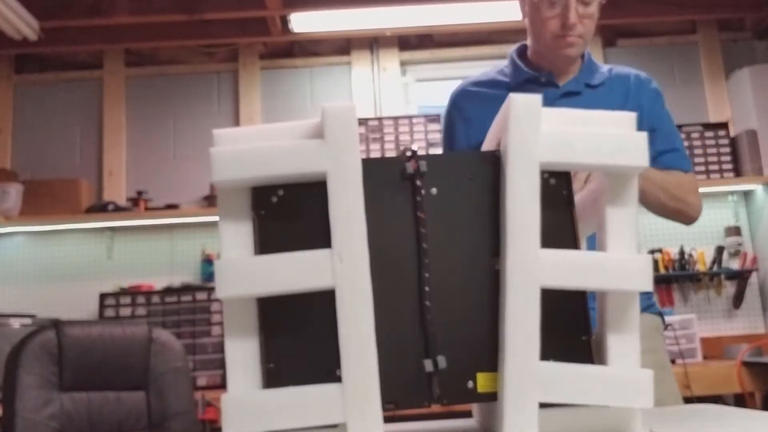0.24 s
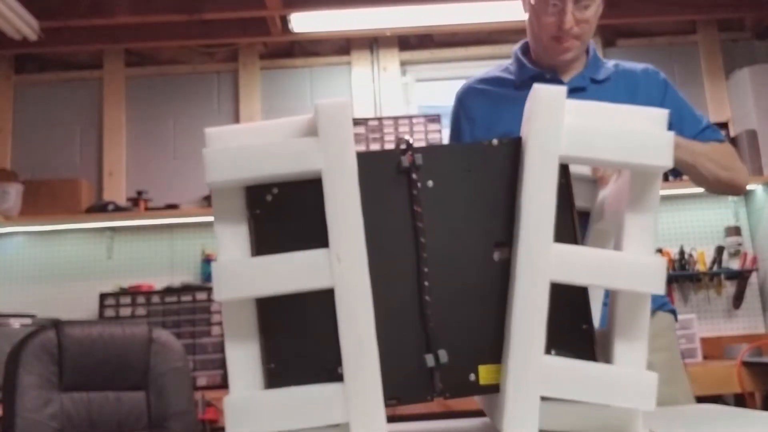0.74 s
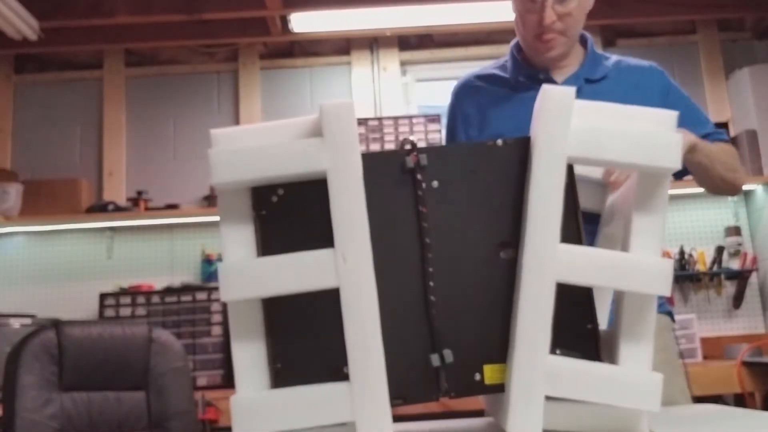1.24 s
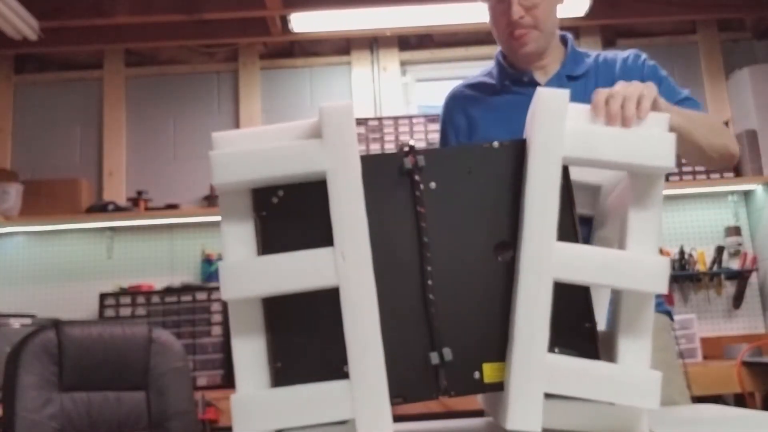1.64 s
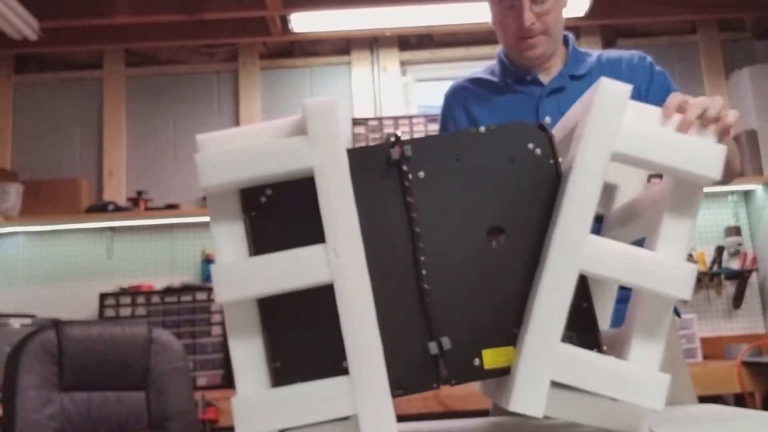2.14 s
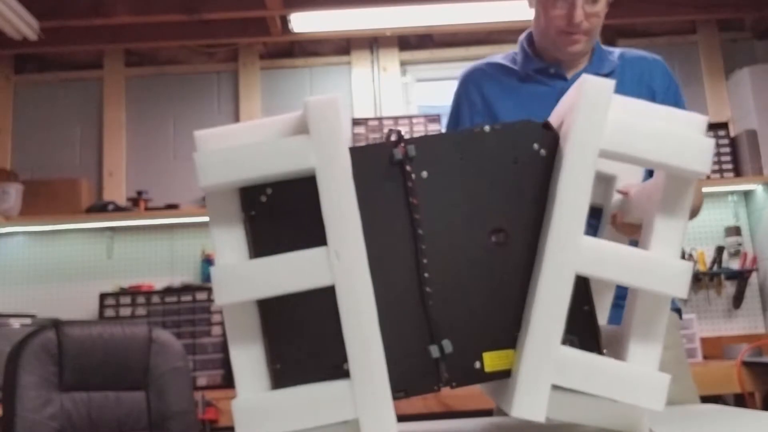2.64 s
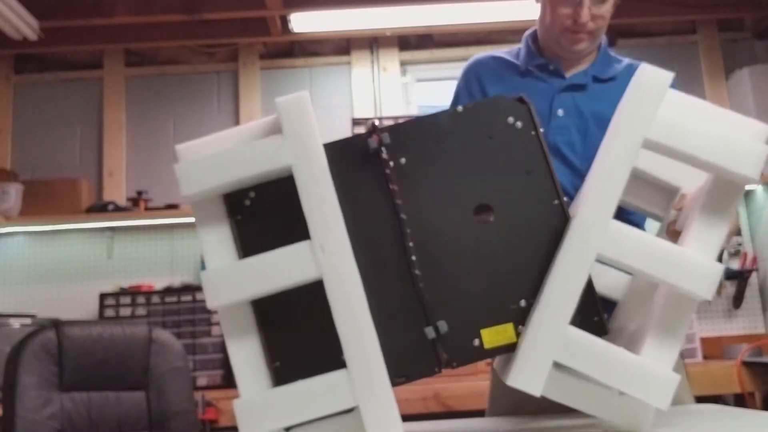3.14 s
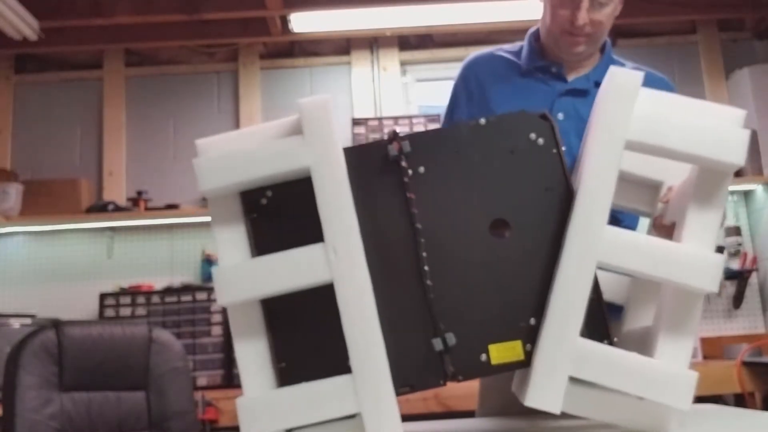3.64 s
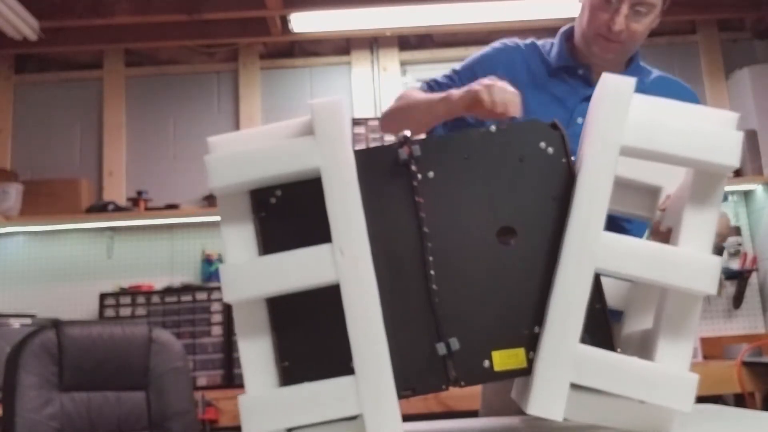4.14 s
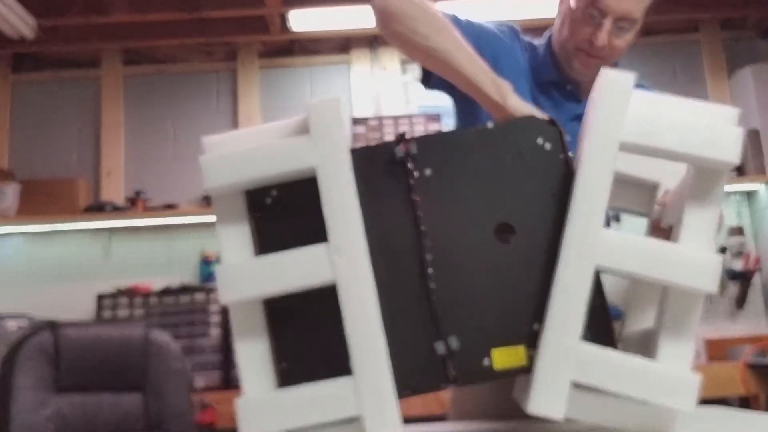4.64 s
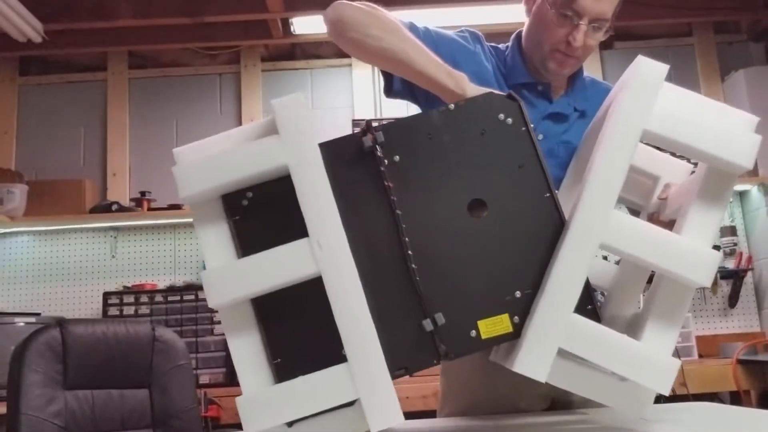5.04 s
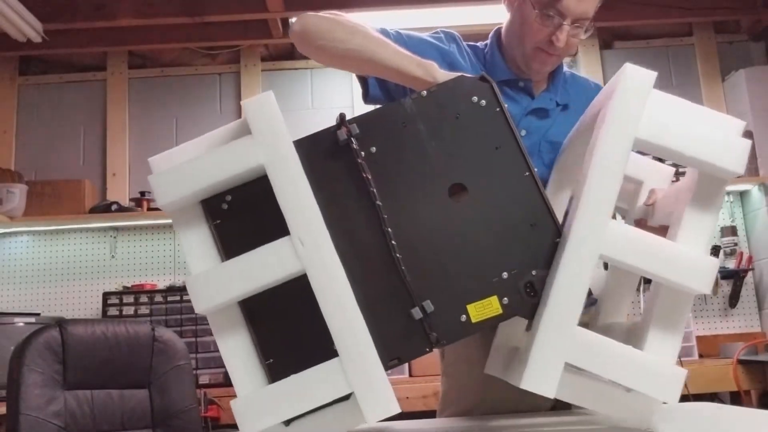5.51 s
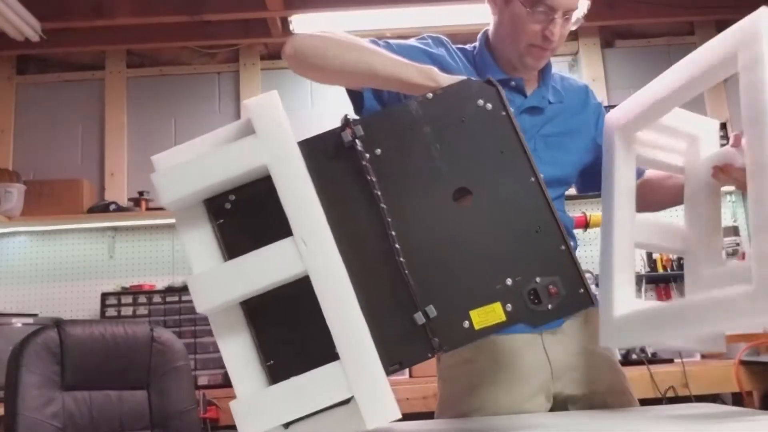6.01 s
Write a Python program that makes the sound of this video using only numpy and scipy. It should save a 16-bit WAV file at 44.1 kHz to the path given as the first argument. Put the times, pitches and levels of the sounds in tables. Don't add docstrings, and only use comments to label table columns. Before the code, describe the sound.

A close stereo microphone in a short-ringing workshop, with faint low rumble, hiss and a barely audible high whine. Foam is already rasping against metal at 0 seconds, with quick squeaks and soft knocks until 0.4, then short rubs near 0.6 and 0.75. Around 1.0 to 1.4 come low juddering slips and dull knocks. At 1.65 a firm knock cracks with a groan and scrape; bright squeaky rubbing follows near 1.9 and 2.15, then the loudest, heavy thump at 2.3. From 2.6 to 3.0 coarse, squeaky drags rasp on, thinning into small scrapes around 3.2 to 3.8. It is nearly quiet near 4.0 to 4.3, then light knocks and rubs at 4.4 and 4.7, and a tiny crackle at 4.9. Stronger scrapes at 5.3 and 5.6 end in a snap and squeak. A muted hollow bump at 6.03 fades into room tone.

```python
import sys
import numpy as np
from scipy import signal
from scipy.fft import rfft, irfft, next_fast_len
from scipy.io import wavfile

SR = 44100
rng = np.random.default_rng(int(sys.argv[2]) if len(sys.argv) > 2 else 0)


def decibels_to_gain(level_db):
    exponent = np.asarray(level_db, float) / 20
    return 10 ** exponent


def file_out(sig):
    cols = np.atleast_2d(sig).T
    lim = np.clip(cols, -1, 1)
    pcm = np.round(lim * 32767).astype(np.int16)
    wavfile.write(sys.argv[1], SR, pcm)


N = 276507
LEFT_LEAD = 6


def unit(x):
    return x / np.sqrt(np.mean(x ** 2) + 1e-20)


def in_time(rows):
    s, *columns = np.transpose(rows)
    return [np.interp(np.arange(N) / SR, s, c) for c in columns]


def at_hz(points, hz):
    table_hz, value = np.array(points).T
    return np.interp(np.log(hz + 1e-9), np.log(table_hz), value)


def filtered(x, order, hz, kind="low"):
    return signal.sosfilt(signal.butter(order, hz, kind, fs=SR, output="sos"), x)


def colour(x, spectrum):
    size = next_fast_len(N)
    hz = np.arange(size // 2 + 1) * SR / size
    return unit(irfft(rfft(x, size) * decibels_to_gain(at_hz(spectrum, hz)), size)[..., :N])


def drift(rate):
    r = np.exp(-2 * np.pi * rate / SR)
    return unit(signal.lfilter([1], [1, -2 * r, r * r], rng.standard_normal(N + SR))[SR:])


def lurches(per_s, fade_s):
    jumps = (rng.random(N) < per_s / SR) * rng.random(N)
    saw = signal.lfilter([1], [1, -np.exp(-1 / (fade_s * SR))], jumps)
    return unit(saw - saw.mean())


def strokes(rows):
    t, power = np.arange(0, N + 32, 32) / SR, 1e-12
    for s, hold, rise, fall, db in rows:
        before = np.maximum(s - t, 0) / max(rise, .003)
        after = np.maximum(t - s - hold, 0) / max(fall, .003)
        power = power + decibels_to_gain(2 * db - 40 * (before + after))
    return np.interp(np.arange(N) / SR, t, 10 * np.log10(power))


def resonate(x, modes, wander_db=0.):
    out, steps = 0, rng.standard_normal((len(modes), 200))
    wander_per_s = 14.
    for k, (hz, width, db) in enumerate(modes):
        r = np.exp(-np.pi * width / SR)
        wander = np.interp(np.arange(N) * wander_per_s / SR, np.arange(200), steps[k])
        poles = [1, -2 * r * np.cos(2 * np.pi * hz / SR), r * r]
        ring = signal.lfilter([1 - r * r, 0, r * r - 1], poles, x)
        out = out + (-1) ** k * decibels_to_gain(db + wander_db * wander) * ring
    return unit(out)


# start_s, left_lead_samples, share_of_slips
CONTACT = [
    (0., 3, .2),
    (1.5, 2.5, .15),
    (1.7, 6.5, .12),
    (2.1, 8.6, .25),
    (2.3, 8, .2),
    (2.6, 6.3, .35),
    (4.5, 6.4, .28),
    (6.3, 6.3, .4),
]


def slips(per_s, spread_db, clumps):
    born = rng.random(N) < per_s / SR
    heights = decibels_to_gain(spread_db * np.minimum(rng.exponential(1, N), 3))
    sizes = born * clumps * heights * rng.choice([-1, 1], N)
    lead, share = in_time(CONTACT)
    anywhere = LEFT_LEAD + 7. * rng.standard_normal(N)
    pick = rng.random(N)
    elsewhere = np.where(pick > 1 - .1, 2, anywhere)
    lag = np.where(pick < share, lead + pick / share - .5, elsewhere)
    arrival = np.clip(np.arange(N) + np.round(lag).astype(int), 0, N - 1)
    return np.array([sizes, np.bincount(arrival, sizes, N)]) + 1e-18


def from_contact(x):
    return np.array([x, np.concatenate([np.zeros(LEFT_LEAD), x[:-LEFT_LEAD]])])


# pitch_hz, level_db (per Hz)
AIR = [(25, -14), (64, -4.5), (100, -2), (240, -16.5), (330, -20), (480, -22), (900, -27), (1650, -28),
       (3700, -33), (9300, -34.5), (13800, -34.5), (15200, -31), (15700, -26)]
# pitch_hz, level_db
WHINE = [(15628, -87)]


def still_air():
    mid, side = rng.standard_normal((2, N))
    side = side * .3 + .7 * signal.lfilter(*signal.butter(1, 400., "high", fs=SR), side)
    (hz, db), = WHINE
    whine = decibels_to_gain(db - 4) * np.sin(2 * np.pi * hz * np.arange(N) / SR)
    return decibels_to_gain(-68.4) * colour(np.array([mid + side, mid - side]), AIR) + whine


# pitch_hz, t60_s
SHOP_T60 = [(100, 0.2), (1000, 0.22), (4000, 0.18), (15000, 0.15)]


def workshop(x):
    t, tail = np.arange(SR // 2) / SR, 0
    mid, side = rng.standard_normal((2, len(t)))
    white = mid + filtered(side, 2, 490.0, "high") * [[1], [-1]]
    edges = 40 * 2. ** np.arange(9.5)
    for low, high in zip(edges, np.minimum(edges[1:], .45 * SR)):
        t60 = at_hz(SHOP_T60, np.sqrt(low * high))
        tail = tail + filtered(white, 2, [low, high], "band") * decibels_to_gain(-60 * t / t60)
    tail = tail * np.clip((t - .003) / .005, 0, 1)
    return signal.fftconvolve(x, tail / np.sqrt(np.sum(tail ** 2) / 2), axes=1)[:, :N]


# start_s, level_db, settle_s
SHIFTS = [(0., -56, 0.091), (.23, -54.5, 0.69), (1.01, -63, 0.18), (1.4, -55, 0.18), (1.68, -51, 0.59),
          (2.35, -45.5, 0.16), (2.65, -57, 0.65), (2.95, -56, 0.36), (3.51, -60, 0.37), (3.84, -60, .06),
          (4.56, -65, 0.9), (5.32, -55, 0.59), (5.62, -67, 0.085), (6.1, -85, 1.)]


def bench():
    modes = [(50.0, 63, -3.0), (79.3, 11.5, 3.5), (119.0, 100, -1.5)]   # pitch_hz, width_hz, level_db
    mid = resonate(slips(200., 1.3, decibels_to_gain(1.07 * drift(25)))[0], modes)
    side = resonate(slips(200., 1.3, decibels_to_gain(1.07 * drift(25)))[0], modes)
    thud = filtered(mid + decibels_to_gain(-14.5) * side * [[1], [-1]], 2, [35., 220.], "band")
    build_s = 0.18
    return decibels_to_gain(strokes([(s, 0, build_s, settle, db) for s, db, settle in SHIFTS])) * thud


# start_s, level_db, pitch_hz (band centre)
CRUMBS = [
    (4.909, -58, 14000),
    (4.958, -62, 11000),
]


def crumbs():
    t, sizzle, out = np.arange(N) / SR, slips(6000., 3.7, 1.), 0
    span, t60_s = 1.15, 0.2
    for s, db, hz in CRUMBS:
        band = unit(filtered(sizzle, 2, [hz / span, hz * span], "band"))
        out = out + decibels_to_gain(db - 60 * np.maximum(t - s, 0) / t60_s) * (t > s) * band
    return out


# rattle_s, t60_s, level_db
BUMP = (0.021, 0.22, -50.5)
# pitch_hz, width_hz, level_db
BUMP_MODES = [(171, 61, 5.5), (250, 52, 11.5), (417, 240, 1.5), (700, 110, 6.5), (1100, 280, 1),
              (1500, 370, 0.5), (2100, 660, -6.5), (2700, 330, -5)]


def bump():
    rattle, t60, db = BUMP
    t = np.arange(N) / SR - 6.029
    body = resonate(slips(6000.0, 1.6, 1.), BUMP_MODES)
    fade = decibels_to_gain(db - 60 * np.maximum(t - rattle, 0) / t60) * np.clip(t / .003, 0, 1)
    return filtered(fade * body, 10, 3100.)


# start_s, level_db (peak), pitch_hz (main ring), sharpness_db, t60_s
KNOCKS = [(0.136, -35, 297, -14, 0.037), (0.187, -57, 222, -6, 0.093), (0.315, -27.5, 277, -23, 0.13),
          (0.962, -33, 676, -16, 0.15), (1.184, -30, 298, -25, 0.074), (1.255, -34, 344, -15, 0.16),
          (1.388, -39.5, 158.4, -31, 0.24), (1.407, -31, 215, -38, 0.058), (1.614, -28, 251, -19, 0.11),
          (1.647, -22.5, 191, -7.5, 0.095), (1.658, -29, 210.2, -10, 0.4), (1.979, -53, 530, 2.5, 0.08),
          (2.247, -30, 235, -18, 0.13), (2.295, -30.5, 925, 0, 0.032), (2.297, -7.5, 235, -42, 0.021),
          (2.633, -31, 472, -11.5, 0.054), (3.189, -33, 310, -25, 0.089), (4.331, -37.5, 250, -22, 0.06),
          (4.411, -43, 644, -4, 0.11), (4.551, -37.5, 250, -31, 0.16), (4.673, -40, 522, -13, 0.23),
          (4.909, -45.5, 700, -5.5, 0.049), (5.581, -35, 290, -19, 0.13)]
# pitch_hz, level_db, t60_s
CHASSIS = [(174, -16, 0.297), (260, -10.5, 0.0333), (454, -34, 0.035), (572, 3.5, 0.046), (700, -12, 0.059),
           (1130, -2, 0.02), (1308, -13, 0.11), (1870, 2, 0.025), (2500, -15.5, 0.054), (2820, -54, .06)]


def knocks():
    out, t = np.zeros(N + SR), np.arange(SR // 4) / SR
    luck = rng.standard_normal((len(KNOCKS), len(CHASSIS)))
    noise = rng.standard_normal((len(KNOCKS), len(t)))
    cracks = signal.lfilter(*signal.butter(2, 2500., fs=SR), noise)
    for (s, db, hz, sharp_db, t60), row, crack in zip(KNOCKS, luck, cracks):
        soft_contact = np.minimum(t / 0.0048, 1)
        blow = np.sin(2 * np.pi * hz * t) * decibels_to_gain(-60 * t / max(t60, .01)) * soft_contact
        blow += decibels_to_gain(sharp_db + 10.0 - 60 * t / 0.1) * crack
        for (mode_hz, mode_db, mode_t60), chance in zip(CHASSIS, row):
            ring = np.sin(2 * np.pi * mode_hz * (1 + 0.029 * chance) * t)
            blow += decibels_to_gain(sharp_db + mode_db + 3.9 * chance - 60 * t / mode_t60) * ring
        out[round(s * SR):][:len(t)] += decibels_to_gain(db - 8.0) * blow
    return out[:N]


# start_s, level_db (peak), pitch_hz
TICKS = [(0.134, -37, 1790), (0.165, -39, 1640), (0.252, -40, 700), (0.306, -35, 853), (1.186, -37, 600),
         (1.648, -21, 560), (1.653, -34, 850), (1.649, -38, 2600), (2.135, -42, 1220), (2.293, -33, 2000),
         (2.295, -28, 890), (2.635, -33, 1360), (3.449, -44, 1400), (3.717, -49, 1960), (4.328, -56, 1100),
         (4.355, -57, 1020), (4.413, -38, 1000), (4.679, -42, 2300), (5.511, -46, 2250), (5.527, -45, 7500),
         (5.581, -22, 590), (6.03, -60, 900), (1.906, -44, 5800), (1.98, -41, 1700), (4.911, -48, 6000),
         (4.47, -46, 1500), (3.456, -43, 2000), (2.253, -40, 3500), (3.752, -40, 500)]


def ticks():
    out, t = np.zeros(N + SR), np.arange(SR // 20) / SR
    cycles = 5.2
    for s, db, hz in TICKS:
        out[round(s * SR):][:len(t)] += decibels_to_gain(db - 60 * t * hz / cycles) * np.sin(2 * np.pi * hz * t)
    return out[:N]


# start_s,
# length_s, start_hz, end_hz, level_db
CREAKS = [(0.147, 0.032, 1500, 1727, -40.5), (0.166, 0.046, 2900, 3010, -42),
          (1.652, 0.027, 856, 894, -37.5), (1.737, 0.029, 2075, 2120, -40.5),
          (2.173, 0.032, 5100, 4300, -41), (2.23, 0.026, 4370, 4650, -45), (4.349, 0.056, 1015, 1054, -57),
          (5.54, 0.026, 2270, 2210, -48), (5.603, 0.017, 7200, 7270, -38), (2.737, 0.1, 2380, 2700, -41),
          (2.872, 0.067, 2600, 2500, -40), (2.939, 0.075, 2700, 2560, -37.5),
          (0.301, 0.033, 844, 800, -45.5), (1.017, 0.055, 700, 700, -48), (1.694, 0.025, 2140, 1860, -41),
          (1.872, 0.038, 700, 700, -36.5), (2.126, 0.04, 1237, 1290, -42),
          (2.152, 0.057, 1904, 2870, -35.5), (2.194, 0.055, 2030, 2430, -36),
          (2.29, 0.039, 2736, 2690, -36.5), (2.617, 0.055, 1285, 1378, -45), (4.417, 0.044, 700, 644, -43),
          (4.411, 0.054, 1079, 984, -43.5), (4.416, 0.032, 1856, 1975, -45.5),
          (4.464, 0.031, 700, 650, -48.5), (4.682, 0.035, 2323, 2340, -44), (4.665, 0.09, 609, 676, -50),
          (5.57, 0.043, 473, 563, -35), (5.58, 0.047, 790, 840, -37), (1.039, 0.046, 993, 1265, -46),
          (0.966, 0.035, 727, 700, -46), (1.268, 0.042, 1500, 1710, -52), (3.44, .12, 2550, 2500, -55),
          (3.457, 0.076, 1248, 1280, -49), (3.756, 0.092, 2390, 2400, -51),
          (2.733, 0.059, 630, 570, -42.5), (2.878, 0.057, 560, 680, -43.5), (2.959, 0.055, 700, 533, -44),
          (4.41, 0.05, 1450, 1400, -59), (5.582, 0.0445, 2750, 2670, -30.5),
          (.18, 0.051, 196, 244, -42.5), (0.52, 0.046, 266, 270, -48), (1.5, 0.08, 310, 330, -60),
          (2.12, 0.043, 280, 260, -51), (2.32, 0.122, 144, 137, -45), (3.47, .06, 228, 232, -46),
          (3.535, 0.041, 190, 179, -45), (4.56, .1, 169, 390, -56), (5.23, 0.034, 190, 190, -40.5),
          (5.33, 0.049, 192.6, 167, -42), (5.53, 0.039, 170, 200, -38.5), (5.585, 0.048, 294, 262, -36.5),
          (1.64, 0.17, 81.4, 84, -37.5), (1.72, 0.11, 64, 56, -38), (5.31, 0.085, 60, 64, -41),
          (2.87, 0.065, 108, 105, -47), (4.58, 0.074, 140, 156, -51), (1.4, 0.048, 348, 322, -55.5),
          (5.74, 0.152, 270, 300, -70.5), (5.8, .08, 430, 603, -76), (1.4, .08, 510, 590, -64),
          (6.03, 0.077, 166, 175, -56), (1.648, 0.0304, 233, 219, -36.5), (.36, 0.044, 285, 294, -51),
          (2.29, 0.17, 75, 70, -45), (1.65, .05, 127, 125, -42),
          (0.421, .07, 2400, 2440, -49), (0.699, .06, 2100, 2200, -50), (4.699, 0.033, 2800, 2700, -53),
           (4.796, .08, 1700, 2300, -58), (5.251, 0.066, 757, 786, -54), (5.547, 0.032, 660, 765, -40.5),
           (5.601, 0.033, 617, 560, -40.5), (5.614, 0.057, 2800, 2700, -43), (6.035, 0.03, 720, 730, -51),
           (1.745, 0.028, 3500, 3700, -43), (1.715, 0.0295, 1900, 1600, -44),
           (1.77, .04, 2900, 2750, -47.5), (1.82, .025, 2700, 2500, -45), (1.765, 0.025, 1400, 1300, -44),
           (2.465, .04, 2300, 2500, -50), (2.51, .05, 3500, 3800, -53), (2.235, .04, 2600, 2700, -43),
           (1.06, 0.039, 1150, 950, -49), (1.045, .04, 720, 746, -49), (5.14, .05, 2200, 2200, -55),
           (5.28, .05, 7200, 7500, -51), (6.035, .045, 2800, 2750, -66), (0.735, .04, 300, 277, -45),
           (3.45, 0.049, 1650, 1600, -54), (3.74, 0.047, 2000, 1950, -57), (4.7, 0.041, 540, 723, -51),
           (0.6, .05, 320, 300, -48), (1.7, .05, 247, 240, -44)]


def squeaks():
    out, waver, rough = np.zeros(N), drift(120.0), drift(180)
    for s, length, start_hz, end_hz, db in CREAKS:
        waver, rough = np.roll(waver, SR // 7), np.roll(rough, SR // 7)
        i = np.arange(round(s * SR), round((s + length) * SR))
        hz = np.linspace(start_hz, end_hz, len(i)) * (1 + 0.05 * (waver[i] - waver[i].mean()))
        swell = decibels_to_gain(db + 3.35 * (rough[i] - rough[i].mean())) * np.hanning(len(i)) ** 0.65
        out[i] += swell * np.sin(2 * np.pi * np.cumsum(hz) / SR)
    return out


# start_s, length_s, level_db
BRUSHES = [
    (4.03, 0.18, -78),
    (4.866, 0.18, -69.5),
    (6.192, 0.093, -96),
]


def brushes():
    gain = np.zeros(N)
    for s, length, db in BRUSHES:
        span = gain[round(s * SR):round((s + length) * SR)]
        span += decibels_to_gain(db) * np.hanning(len(span))
    return gain


# start_s, settle_s, force_db, weight_db, speed_db
JERKS = [(0.0, 0.084, -43.5, -9, -5.5), (0.981, 0.18, -54.5, 8.5, -1), (1.191, 0.059, -53.5, 15.5, -10),
         (1.571, 0.041, -86, 30, -19), (1.625, 0.078, -54, 5, 2.5), (1.65, 0.62, -51, 9.5, -2.5),
         (1.898, 0.13, -45.5, -14, -11.5), (2.295, 0.18, -42.5, -2, -1.5), (2.629, 0.5, -46.5, 1, -5.5),
         (2.69, 0.37, -45, 2.5, -7), (3.449, 0.23, -55, 6, -2), (3.688, .06, -79, 26, -5),
         (4.337, 0.98, -67, 13, -2.5), (0.135, 0.11, -52.5, -12, -12), (2.134, .06, -49.5, -8, -11),
         (4.411, 0.073, -57.5, 6, -5), (4.677, 0.14, -52, -1, -7), (4.74, 0.43, -53.5, -2, -17)]
# let_go_s, build_s, force_db, weight_db, speed_db
PULLS = [(0.178, 0.046, -41, -2, 0.5), (0.32, 0.73, -57.5, 11, -4), (0.64, 0.08, -59.5, 17, 1.5),
         (0.752, 0.5, -46.5, 1, -7), (0.975, 0.095, -57, 6.5, -2.5), (1.331, 0.45, -64.5, 14, 3.5),
         (1.783, 0.12, -45.5, -7, -6), (1.89, 0.13, -48, 4.5, -8.5), (2.295, 0.053, -45, -8, -6),
         (2.512, 0.063, -68, -9, 12), (2.802, 0.24, -43, 5, -6.5), (3.2, 0.13, -51, 2.5, -3),
         (3.512, 0.55, -52.5, -1, -8.5), (4.452, 0.13, -55.5, 4, -9), (4.722, 0.1, -52.5, -5, -14),
         (4.86, 0.2, -53.5, -10, -10.5), (5.308, 0.18, -42.5, 0.5, -4), (5.37, 0.11, -52, 4, -17),
         (5.55, 0.11, -45.5, 5.5, -10), (5.588, 0.07, -41, 0, 2.5), (5.612, 0.067, -42, -11, 5)]
# start_s, length_s, force_db, weight_db, speed_db
DRAGS = [(0.213, 0.395, -55.5, -8, -6), (0.99, 0.058, -56.5, 10, -15), (1.226, 0.13, -57, 5.5, -3.5),
         (1.98, 0.32, -61, -23, -22), (2.1574, 0.062, -43, -12.5, 0), (2.464, 0.066, -56.5, -1.5, 4),
         (2.888, 0.092, -43, 2.5, -8), (2.817, 0.061, -48, -8, -8.5), (3.01, 0.018, -45.5, 3, -10.5),
         (3.083, 0.033, -60.5, 7, -12), (3.215, 0.019, -62.5, 9, -8), (3.335, 0.05, -57.5, -15, -3.5),
         (3.523, 0.024, -55, 2.5, -14), (3.737, 0.016, -56, 7, -7), (3.77, 0.063, -53, 5.5, -4),
         (4.515, 0.047, -66, 1, -4), (5.119, 0.16, -57.5, -10, -14.5), (5.666, 0.039, -65, 5.5, -18),
         (5.76, 0.03, -76, 9.5, -20), (0.79, 0.085, -75.5, 1, 4), (4.04, 0.12, -82, 3, -1),
         (4.19, 0.032, -92, 11, -2), (1.753, 0.054, -47.5, -6, -2), (4.69, 0.025, -54.5, -0.5, -1.5),
         (4.47, 0.014, -62.5, 6, -9), (6.21, .06, -83, 7, -18), (2.51, 0.031, -57, -8, 3.5),
         (3.38, .06, -56.5, -6, -0.5), (1.044, 0.036, -58.5, 9, -11), (5.13, 0.052, -62.5, -10, -6)]


def effort(weight_share, speed_share, steep):
    break_s, let_go_s, take_up_s, ease_off_s = .012, 0.086, 0.046, 0.095
    shapes = ([(s, 0, break_s, settle, *rest) for s, settle, *rest in JERKS]
              + [(s, 0, build, let_go_s, *rest) for s, build, *rest in PULLS]
              + [(s, length, take_up_s, ease_off_s, *rest) for s, length, *rest in DRAGS])
    rows = []
    for s, hold, rise, fall, force, weight, speed in shapes:
        level_db = force + weight_share * weight + speed_share * speed
        rows.append((s, hold, rise / steep, fall / steep, level_db))
    return strokes(rows)


# start_s, pressure_db (on the cells), lean_db (on the struts)
GRIP = [(0., -2, -0.5), (.18, -18, 0), (.45, -2.5, 0), (.65, -4.5, -3), (1.02, -11, 3), (1.25, -6, -2),
        (1.65, -9.5, 1.5), (1.9, -4.5, 0), (2.18, 3, 2.5), (2.35, -11, -5.5), (2.72, -3.5, 1.5),
        (3.02, -5, 1), (3.2, -11, 0), (3.52, -10, -1), (3.85, -15, -1.5), (4.45, -11, -1.5), (4.6, -7, -3),
        (5.2, -0.5, -1), (5.6, -8, 0)]
# pitch_hz, width_hz, level_db
JUDDER_MODES = [(175.6, 57.5, -3.5), (228.6, 45.5, 0), (264.5, 48.4, 0.5), (338.2, 30, 0.5),
                (369.6, 47, -1.5)]
STRUT_MODES = [(440, 38, -11), (524.3, 31, -3.5), (635, 44, -5), (692.7, 24.7, -1), (830.5, 54, -4.5),
               (897, 154, -9), (1174, 210, -10.5)]
CELL_MODES = [(1415, 1090, 5.5), (1780, 225, 11.5), (2290, 750, 4.5), (2463, 56, 1), (2513, 41, 2),
              (3040, 1460, -2.5)]
PRESSED_MODES = [(4090, 1880, 19), (5540, 390, -15.5), (6940, 1400, -3)]
# pitch_hz, level_db (per Hz)
HISS = [(1650, -11.5), (2800, -5), (3400, -6.5), (4100, -10.5), (5000, -10), (6600, -12), (8000, -11),
        (9300, -16), (11000, -11), (13100, -11.5), (14600, -16), (15700, -13.5)]


def rubbing():
    pressure_db, lean_db = in_time(GRIP)
    judder_db = effort(0.98, 0, steep=0.98) - lean_db
    strut_db = effort(0.57, 0, steep=1.0) + lean_db
    rasp_db, hiss_db = effort(0, 0, steep=1.127), effort(0, 0.77, steep=1.214)
    grip = lurches(40., 0.01)
    judder = resonate(slips(400., 1.93, decibels_to_gain(0.54 * drift(32.3))), JUDDER_MODES)
    struts = resonate(slips(1200., 2.94, decibels_to_gain(0.25 * grip)), STRUT_MODES, wander_db=2.1)
    fine = slips(5000., 1.6, decibels_to_gain(0.43 * grip))
    rasp = filtered(resonate(fine, CELL_MODES, wander_db=1.64), 6, 3220)
    rasp = rasp * decibels_to_gain(np.array([[.4], [-.4]]))
    finest = slips(14000., 3.3, decibels_to_gain(0.9 * grip))
    pressed = resonate(finest, PRESSED_MODES, wander_db=3.5)
    hiss = colour(finest, HISS) + decibels_to_gain(pressure_db - 2.0) * pressed
    hiss = hiss * decibels_to_gain(np.array([[-.3], [.3]]))
    return (decibels_to_gain(judder_db - 4.0) * judder + decibels_to_gain(strut_db - 1.5) * struts + decibels_to_gain(rasp_db + 2.5) * rasp
            + (decibels_to_gain(hiss_db + 1.47) + brushes()) * hiss)


def scene():
    work = rubbing() + bump() + from_contact(squeaks() + knocks() + ticks())
    work = filtered(work, 2, 130., "high") * decibels_to_gain(np.array([[.2], [-.2]]))
    return decibels_to_gain(-0.5) * work + workshop(work) * decibels_to_gain(-4.5) + bench() + still_air() + crumbs()


def low_pass(x):
    return signal.sosfilt(signal.butter(12, 16850, fs=SR, output="sos"), x)


def record(dry):
    mix = signal.sosfilt(signal.ellip(12, .5, 70, 15740, fs=SR, output="sos"), dry)
    return low_pass(mix)


dry = scene()
out = record(dry)
file_out(out)
```